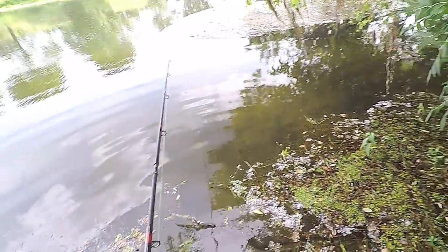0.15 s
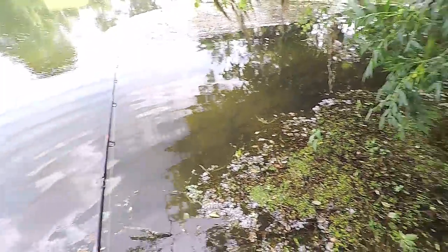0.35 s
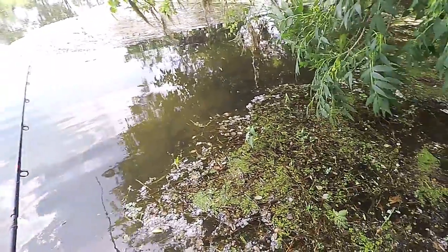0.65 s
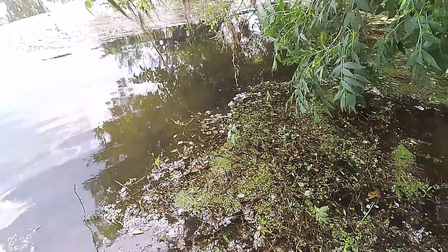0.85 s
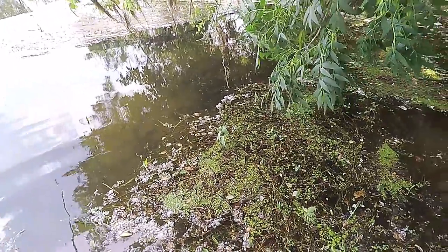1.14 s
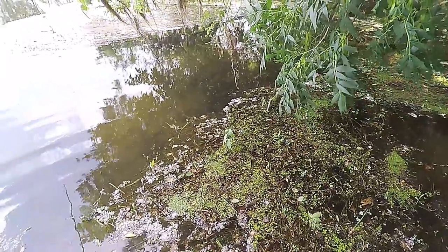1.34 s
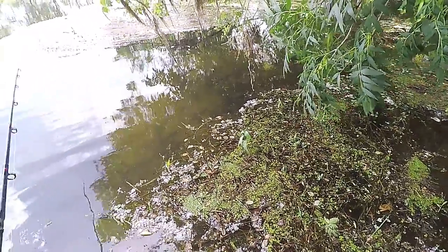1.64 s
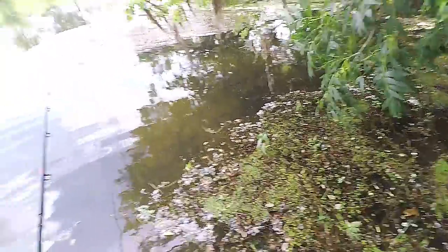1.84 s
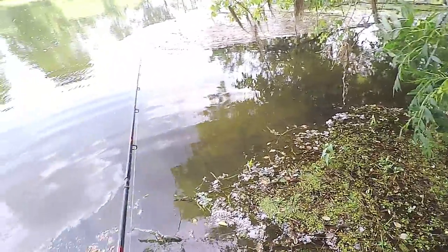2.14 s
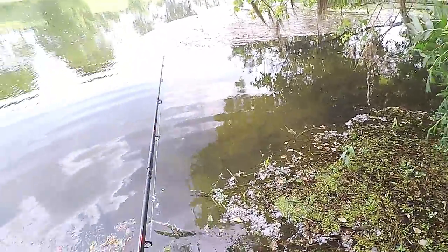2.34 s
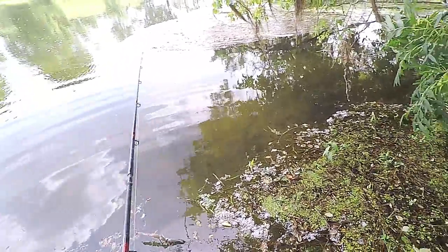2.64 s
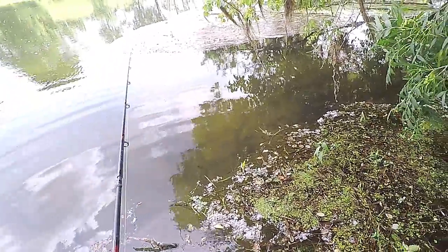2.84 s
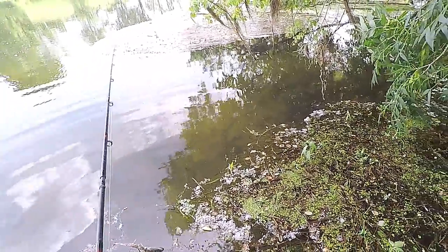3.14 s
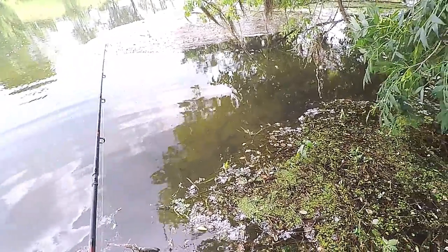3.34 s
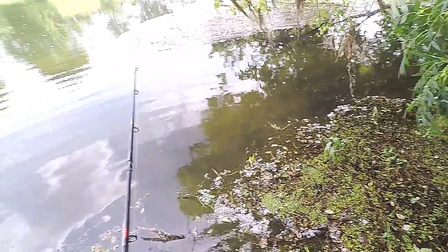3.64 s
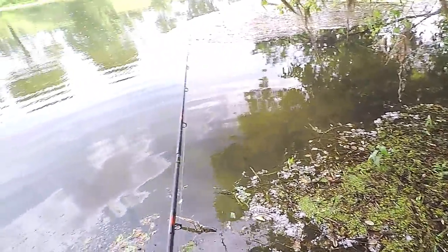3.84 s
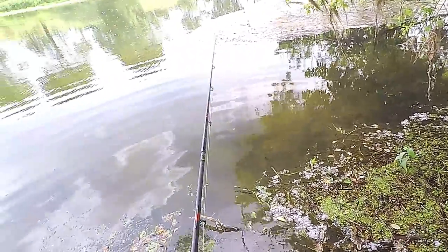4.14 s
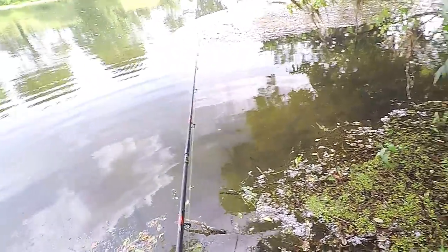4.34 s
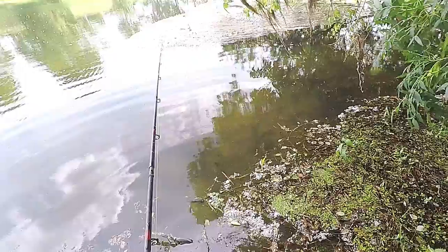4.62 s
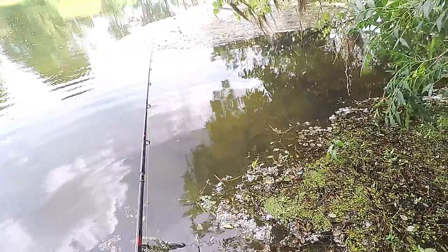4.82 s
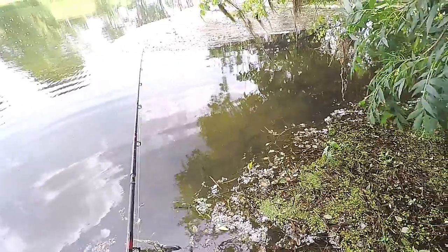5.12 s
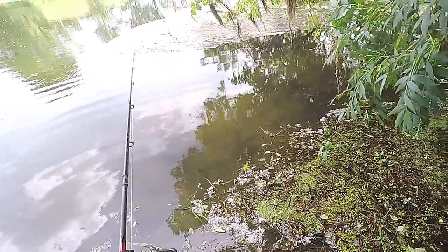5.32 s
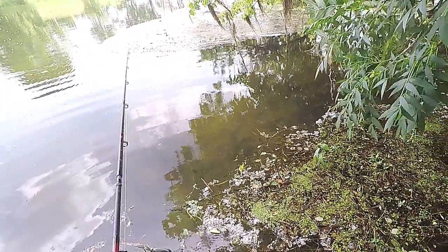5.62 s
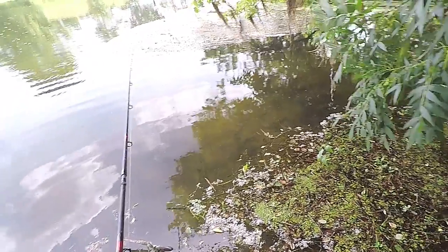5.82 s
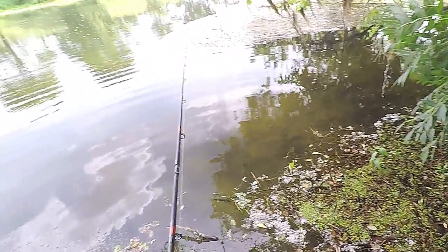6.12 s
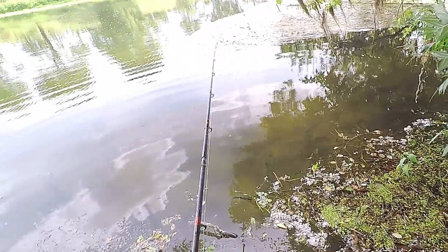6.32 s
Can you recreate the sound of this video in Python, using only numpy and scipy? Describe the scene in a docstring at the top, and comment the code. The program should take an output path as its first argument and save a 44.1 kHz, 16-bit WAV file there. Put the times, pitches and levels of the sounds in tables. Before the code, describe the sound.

Wood clonks the water three times in steady rhythm, each a slap and gulping bubble; drips settle, leaving birds and soft air.

```python
"""A still pond under trees full of birds: wood is driven three times into the water close to one microphone.
Each stroke slaps (filtered noise and a ringing blade), pulls open an air pocket and pinches it off into a
bubble whose gliding tone sings upward. Water sprays, trickles and drips after it as clicks and dying rings.
Birds are bending tones and blurred bands of noise, echoed by the trees. Low noise rumbles at the microphone
with the push of the first stroke, then in gusts of a dying breeze; the plops overload it. Beneath lies a
quiet bed of hum, leaves and hiss."""
import sys
import numpy as np
from scipy import signal
from scipy.fft import rfft, irfft
from scipy.io import wavfile
from scipy.ndimage import uniform_filter1d

SR = 44100
rng = np.random.default_rng(int(sys.argv[2]) if len(sys.argv) > 2 else 0)


def to_linear_factor(level_db):
    """Convert decibel levels (scalar or array-like) to linear amplitude factors."""
    exponent = np.asarray(level_db, float) / 20
    return 10 ** exponent


def transcribe(u):
    """Save the signal u as a 16-bit wav file named by the first command-line argument.

    u: samples, shape (n,) or (channels, n), limited to [-1, 1]; the rate is SR.
    q: integer samples, one column per channel.
    """
    v = np.clip(np.atleast_2d(u).T, -1, 1)
    q = np.round(v * 32767).astype(np.int16)
    wavfile.write(sys.argv[1], SR, q)


N = 285318


def rms_one(x):
    """Scale a sound to unit rms."""
    return x / np.sqrt(np.mean(x ** 2))


def coloured(x, points):
    """Shape a spectrum by (Hz, dB) points joined over log frequency; unit rms."""
    hz, db = np.transpose(points)
    f = np.maximum(np.arange(len(x) // 2 + 1) * SR / len(x), 1)
    gain = to_linear_factor(np.interp(np.log(f), np.log(hz), db))
    return rms_one(irfft(rfft(x) * gain, len(x)))


def band(x, hz, width_hz):
    """Keep a bell-shaped band of the spectrum; unit rms."""
    f = np.arange(len(x) // 2 + 1) * SR / len(x)
    bell = np.exp(-((f - hz) / width_hz) ** 2 * 2)
    return rms_one(irfft(rfft(x) * bell, len(x)))


def walk(rate_hz):
    """Random levels, held one period each and slewed twice into a smooth wander."""
    hold = int(SR / rate_hz)
    steps = np.repeat(rng.standard_normal(N // hold + 1), hold)
    return uniform_filter1d(uniform_filter1d(steps, hold), hold)[:N]


def add(out, s, x):
    """Mix x into out from time s."""
    i = max(int(s * SR), 0)
    out[i:i + len(x)] += x[:N - i]


def curve(rows):
    """Start time, sample times from there, and each column of a table at every sample."""
    s, *columns = np.transpose(rows)
    t = np.arange(s[0], min(s[-1], (N - 1) / SR), 1 / SR)
    return s[0], t, *(np.interp(t, s, c) for c in columns)


def fade(count, seconds):
    """Soft ends."""
    i = np.arange(count)
    to_end = np.minimum(i, count - i) / (seconds * SR)
    return np.sin(np.pi / 2 * np.clip(to_end, 0, 1)) ** 2


def decay(t, t60_s):
    """Die away by 60 dB in t60_s."""
    return np.exp(-np.log(1000) * t / t60_s)


def swell(s, rise_s, t60_s):
    """An envelope over the whole scene that climbs exponentially to 1 at time s and dies away."""
    t = np.arange(N) / SR - s
    return np.exp(np.where(t < 0, t / rise_s, -np.log(1000) * t / t60_s))


# level of the open pocket's swell: share_of_open_time, peak_db
OPEN_SWELL = [(0, -20), (.2, -5.5), (.36, 0)]
TROUGH_AT = .6  # share of the open time
# level as the pocket closes: share_of_open_time, peak_db
CLOSING = [(.8, -4), (1, .5)]
# first swings of the shut bubble: after_shutting_s, peak_db
FIRST_SWINGS = [(.002, 3.5), (.006, 2.5), (.0095, -3.5)]
# the shut bubble fading: share_of_life, peak_db
FADING = [(.88, -19.5), (1, -27)]


def pocket(shut_s, opening, pinched):
    """An air pocket deepens and drops in pitch, shuts at a crest of pressure, then sings upward."""
    open_s, first_hz, last_hz, trough_db = opening
    life_s, low_hz, top_hz, climb_s, later_db = pinched
    t = np.arange(-int(open_s * SR), int(life_s * SR)) / SR  # 0 where it shuts
    opened = np.clip(1 + t / open_s, 0, 1)
    deepening_hz = first_hz + (last_hz - first_hz) * (1 - np.cos(np.pi * opened)) / 2
    rising_hz = top_hz - (top_hz - low_hz) * np.exp(-t / climb_s)
    hz = np.where(t < 0, deepening_hz, rising_hz)
    open_shares = OPEN_SWELL + [(TROUGH_AT, trough_db)] + CLOSING
    while_open = [((share - 1) * open_s, db) for share, db in open_shares]
    life_shares = [(0.46, later_db)] + FADING
    once_shut = FIRST_SWINGS + [(share * life_s, db) for share, db in life_shares]
    db = np.interp(t, *np.transpose(while_open + once_shut))
    turns = np.cumsum(hz) / SR
    turns -= np.interp(0, t, turns)  # puts a crest at the moment of shutting
    return shut_s - open_s, to_linear_factor(db) * np.cos(2 * np.pi * turns) * fade(len(t), 0.0015)


# moments when the mouth of each pocket closes: shut_s
SHUT_S = [.1915, .8968, 1.6176]
# open pocket of each stroke: open_s, first_pitch_hz, last_pitch_hz, last_trough_peak_db
OPENING = [(.021, 118, 68, -2), (.020, 104, 42, 2), (.0256, 96, 45, -5.5)]
# shut bubble of each stroke: life_s, first_pitch_hz, final_pitch_hz, climb_time_constant_s,
# peak_db at 0.46 of its life
PINCHED = [(.035, 90, 400, .0095, -10), (.050, 170, 455, .033, -4), (.042, 180, 380, .0135, -10.5)]


def pockets():
    """The three breathing air pockets, one to a stroke."""
    out = np.zeros(N)
    for stroke in zip(SHUT_S, OPENING, PINCHED):
        add(out, *pocket(*stroke))
    return out


# slaps of wood on water: peak_s, hiss_level_db, t60_s, blade_ring_gain_db
SLAPS = [(0.1705, -23, 0.02, -11.5), (0.173, -13.5, 0.022, -18), (0.182, -27, 0.026, -37),
         (.187, -19.5, 0.041, -38), (0.195, -38, 0.072, -31), (0.886, -13.5, 0.025, -13.5),
         (.897, -19.5, 0.022, -26), (1.577, -47, 0.03, -37), (1.586, -28, 0.033, -24),
         (1.595, -14, 0.027, -8), (1.605, -27.5, 0.064, -31), (1.621, -26.5, 0.049, -34)]
SLAP_RISE_S = 0.0027  # e-fold time
# relative spectrum of the slap hiss: frequency_hz, density_db
SLAP_COLOUR = [(350, -14), (600, 8.5), (915, -7.5), (1320, -2.5), (1600, -8), (1830, -6.5), (2540, -7),
               (3710, -11), (4490, -6.5), (5580, -12), (7130, -11), (8630, -16), (10000, -40), (13300, -31),
               (15500, -42)]
# modes of the wooden blade: pitch_hz, relative_level_db, t60_s
BLADE = [(520, 1, 0.03), (1303, -1.5, 0.031), (2600, 1.5, 0.0062), (4600, -21, 0.037), (6760, -31, .013)]


def slaps():
    """Wood meets water: short swells of hiss, each with a dying ring of the blade's modes."""
    out = np.zeros(N)
    hiss = coloured(rng.standard_normal(N), SLAP_COLOUR)
    after = np.arange(SR // 8) / SR
    blade = sum(to_linear_factor(db) * np.sin(2 * np.pi * hz * after) * decay(after, t60) for hz, db, t60 in BLADE)
    for s, hiss_db, t60, ring_db in SLAPS:
        out += to_linear_factor(hiss_db) * swell(s, SLAP_RISE_S, t60) * hiss
        add(out, s, to_linear_factor(ring_db) * blade)
    return out


def grains(rate_hz, spread_db):
    """Scattered clicks, a few large among many small."""
    hits = rng.random(N) < rate_hz / SR
    return hits * rng.standard_normal(N) * to_linear_factor(spread_db * rng.exponential(size=N))


def bubble(hz, cycles, glide):
    """A ring that starts at hz, loses two e-folds in its cycles and climbs as it nears the surface."""
    turns = np.arange(int(3 * cycles / hz * SR)) * hz / SR
    ring = np.sin(2 * np.pi * turns * (1 + glide * turns / cycles / 2))
    return ring * np.exp(-2 * turns / cycles) * (1 - np.exp(-2 * turns))


def trickle_bubbles():
    """Thousands of tiny rising rings, random in time, pitch and loudness; unit rms while wet."""
    wet_s = 2.5
    out = np.zeros(N)
    for when, size, loud in rng.random((2500, 3)):
        ring = bubble(650 * 3.02 ** size, 7.7, 0.266)
        add(out, when * wet_s, to_linear_factor(14 * loud ** 4) * ring)
    return out / np.sqrt(np.mean(out[:int(wet_s * SR)] ** 2))


# relative spectrum of the spray: frequency_hz, density_db
SPRAY_COLOUR = [(1180, -34), (2000, -18), (2120, 4.5), (3100, 6), (3460, 0), (4590, 11), (6870, 10.5),
                (7610, 2.5), (8880, -62), (10200, -48), (12300, -26), (14700, -28), (15500, -33)]
# water thrown up or shaken off: peak_s, spray_level_db, trickle_level_db, rise_e_fold_s, t60_s
SHOWERS = [(0.0, -46.5, -60, .01, .25), (.15, -40, -64, 0.018, .3), (.205, -40, -36, .01, 0.58),
           (.39, -55, -46, .05, 0.34), (.48, -44, -43.5, 0.07, 0.74), (.748, -47, -66, .02, 0.41),
           (.872, -40.5, -50, 0.019, .2), (.915, -42.5, -40.5, .01, 1.7), (1.15, -50, -46, .05, 0.35),
           (1.307, -49.5, -71, 0.14, .5), (1.477, -38, -54, 0.0055, .15), (1.575, -43.5, -53, .02, 0.17),
           (1.662, -40, -36, 0.025, 0.14), (1.72, -49, -60, .03, 1.6), (1.845, -49, -43.5, 0.069, 1.1),
           (1.99, -54, -57, .03, 0.31), (2.197, -44.5, -66, 0.0064, 0.72)]
# tiny bubbles rush into the hole as each pocket shuts
GURGLE_DB, GURGLE_AFTER_S, GURGLE_RISE_S, GURGLE_T60_S = -31.5, 0.011, 0.0029, 0.1


def showers():
    """Fine spray of filtered clicks and a trickle of bubbles, each under swells whose powers add."""
    spray = coloured(grains(6000, 1.3), SPRAY_COLOUR) * to_linear_factor(3.2 * walk(59.57))
    trickle = trickle_bubbles()
    spray_power, trickle_power = np.zeros(N), np.zeros(N)
    for s in SHUT_S:
        gurgle = to_linear_factor(GURGLE_DB) * swell(s + GURGLE_AFTER_S, GURGLE_RISE_S, GURGLE_T60_S)
        trickle_power += gurgle ** 2
    for s, spray_db, trickle_db, rise, t60 in SHOWERS:
        power = swell(s, rise, t60) ** 2
        spray_power += to_linear_factor(2 * spray_db) * power
        trickle_power += to_linear_factor(2 * trickle_db) * power
    return np.sqrt(spray_power) * spray + np.sqrt(trickle_power) * trickle


# droplets that tick on the surface: start_s, onset_level_db, centre_hz
TICKS = [(0.1256, -40, 6670), (0.284, -40, 5740), (0.414, -39, 4370), (0.461, -36, 5570),
         (0.4836, -31.5, 5300), (0.5474, -45, 4870), (0.6085, -35, 6400), (0.7506, -29.5, 6560),
         (0.848, -31, 5500), (1.036, -41, 6850), (1.313, -33, 5900), (1.475, -32, 5500),
         (1.5633, -45, 4150), (1.8214, -50, 5860), (2.1944, -42, 6540)]
TICK_WIDTH_HZ, TICK_DECAY_S = 2900, 0.0047


def ticks():
    """Droplets hit the surface: bursts of banded noise that die in milliseconds."""
    out = np.zeros(N)
    after = np.arange(SR // 20) / SR
    for s, db, hz in TICKS:
        noise = rng.standard_normal(len(after))
        body = band(noise, hz, TICK_WIDTH_HZ)
        sheen = to_linear_factor(-24) * band(noise, 15800, 1700)  # faint, above the body
        add(out, s, to_linear_factor(db) * (body + sheen) * np.exp(-after / TICK_DECAY_S))
    return out


# droplets that trap a small bubble: start_s, gain_db, starting_pitch_hz, decay_cycles (two e-folds)
BUBBLES = [(.140, -29, 2500, 6), (.353, -31, 1080, 8.8), (.396, -31, 2680, 6), (.440, -29.5, 1880, 17),
           (1.025, -31, 1000, 6), (1.044, -30, 860, 8), (1.092, -26, 1410, 9.4), (1.093, -26, 706, 5),
           (1.14, -33, 1075, 12), (1.112, -37, 4000, 9), (1.121, -29.5, 3500, 6.5), (1.163, -31, 1780, 14),
           (1.172, -32, 3970, 10), (1.226, -29, 4100, 8.4), (1.475, -23.5, 2140, 9.1),
           (1.564, -30, 3600, 8), (1.782, -30, 4300, 12), (1.786, -28.5, 466, 8.7), (1.826, -36, 2600, 8),
           (1.848, -25, 1400, 8.4), (1.852, -35, 750, 10), (1.905, -25, 2360, 4.5), (1.980, -30, 1620, 4),
           (2.038, -31, 2600, 6.7)]


def drops():
    """Single droplets trap air that rings and climbs in pitch."""
    out = np.zeros(N)
    for s, db, hz, cycles in BUBBLES:
        add(out, s, to_linear_factor(db) * bubble(hz, cycles, 0.19))
    return out


# clear notes of nearer birds: start_s, length_s, start_pitch_hz, middle_pitch_hz, end_pitch_hz,
# start_level_db, end_level_db
WHISTLES = [ (0, .1, 2125, 2015, 1970, -44.5, -53), (.365, .072, 1800, 1720, 1694, -48, -54),
            (.43, .027, 1700, 1870, 2500, -48, -46), (.525, .098, 2080, 2195, 2270, -45, -50),
            (.613, .033, 2250, 2440, 2594, -50, -45), (.636, .14, 2594, 2588, 2580, -44.5, -56),
            (1.04, .092, 1835, 1840, 1870, -57, -47), (1.122, .044, 1860, 2230, 2545, -46, -49),
            (1.156, .16, 2540, 2595, 2540, -47, -66), (1.505, .065, 3680, 3610, 3540, -60, -55),
            (2.015, .06, 3470, 3170, 3080, -51, -48), (2.15, .075, 1250, 1500, 1780, -62, -50),
            (2.215, .068, 1740, 1840, 1860, -50, -42), (2.292, .042, 1750, 2000, 1600, -45, -46),
            (2.341, .047, 1800, 1930, 1740, -46, -51), (2.182, .085, 3640, 3300, 3370, -50, -52),
            (2.255, .14, 3340, 3620, 3600, -49, -58), (2.4, .06, 2870, 2740, 2665, -48, -50),
            (2.45, .1, 2675, 2650, 2650, -50, -53), (2.545, .115, 1660, 1710, 1610, -47, -54),
            (2.721, .018, 2130, 2410, 2520, -50, -44), (2.732, .054, 2520, 2500, 2460, -44, -42),
            (2.779, .017, 2480, 2370, 1950, -41, -43), (2.96, .08, 3450, 3220, 3310, -47, -60),
            (3.078, .042, 3560, 3470, 3420, -53, -53), (3.115, .085, 3560, 2670, 2300, -44, -55),
            (3.757, .03, 2325, 2080, 1960, -54, -50), (3.779, .078, 1970, 1960, 2030, -51, -48),
            (3.848, .044, 2030, 1800, 1620, -48, -55), (3.885, .105, 1610, 1770, 1850, -52, -55),
            (4.76, .09, 2150, 2200, 2240, -55, -49), (4.84, .15, 2237, 2265, 2270, -49, -57),
            (4.88, .3, 2825, 2870, 2795, -52.5, -51.5), (6.12, .15, 1615, 1720, 1715, -52, -57)]
# hoarse notes, whose pitch wavers widely: the same columns
HOARSE_NOTES = [ (2.6, .062, 4050, 3740, 3320, -55, -52), (2.735, .043, 5250, 4900, 4350, -52, -38),
                (2.85, .12, 3740, 3890, 3980, -50, -56), (2.94, .16, 5520, 5740, 5700, -59, -60),
                (3.478, .1, 1705, 1950, 2095, -52, -52), (3.57, .18, 2080, 2170, 2200, -51, -58),
                (3.65, .18, 6100, 6300, 6400, -59, -61), (4.09, .15, 2520, 2300, 2200, -52, -49),
                (4.23, .14, 2215, 2120, 2045, -49, -46.5), (4.36, .09, 2050, 2030, 2016, -47, -59),
                (4.14, .27, 4830, 4700, 4750, -51, -63), (5.98, .045, 5150, 4990, 4890, -60, -48),
                (6.017, .18, 4890, 4885, 4890, -47.5, -61)]
CLEAR_WAVER_HZ, HOARSE_WAVER_HZ, NOTE_EDGE_S = 12, 90, .008  # scale of the pitch wander; soft ends


def whistles():
    """Each note bends smoothly through three pitches as its level slides and flutters."""
    out, waver, flutter = np.zeros(N), walk(250), walk(70)
    for rows, waver_hz in ((WHISTLES, CLEAR_WAVER_HZ), (HOARSE_NOTES, HOARSE_WAVER_HZ)):
        for s, length, start_hz, middle_hz, end_hz, start_db, end_db in rows:
            u = np.linspace(0, 1, int(length * SR))
            i = np.arange(len(u)) + int(s * SR)
            bend = np.polyfit([0, .5, 1], [start_hz, middle_hz, end_hz], deg=2)
            hz = np.polyval(bend, u) + waver_hz * waver[i]
            tone = np.sin(2 * np.pi * np.cumsum(hz) / SR)
            db = start_db + (end_db - start_db) * u + 1.5 * flutter[i]
            add(out, s, np.sqrt(2) * to_linear_factor(db) * tone * fade(len(u), NOTE_EDGE_S))
    return out


# trill of a nearer bird: time_s, pitch_hz, level_db, pitch_swing_hz
TRILL = [(6.295, 2040, -52, 5), (6.315, 1980, -43, 10), (6.33, 1930, -43, 100), (6.35, 1926, -46, 210),
         (6.39, 2080, -41.5, 280), (6.435, 2116, -42.5, 290), (6.465, 2060, -56, 270)]
TRILL_RATE_HZ, TRILL_TOP_S = 51.7, 4.6  # rate of the swings; a moment that sets their phase
TRILL_LEAD, TRILL_THROB_DB = 0.11, 7  # share of a swing; throb at the widest swing


def trill():
    """A tone swings fast in pitch and throbs loudest just before each top."""
    out = np.zeros(N)
    s, t, hz, db, swing_hz = curve(TRILL)
    beat = 2 * np.pi * (t - TRILL_TOP_S) * TRILL_RATE_HZ
    chirp = np.sin(2 * np.pi * np.cumsum(hz + swing_hz * np.cos(beat)) / SR)
    throb_db = TRILL_THROB_DB * swing_hz / swing_hz.max() * np.cos(beat + 2 * np.pi * TRILL_LEAD)
    add(out, s, np.sqrt(2) * to_linear_factor(db + throb_db) * chirp * fade(len(t), .004))
    return out


# far birds blurred by the trees: start_s, end_s, centre_hz, width_hz, starting_level_db
FAR_BIRDS = [(2.049, 2.116, 5030, 900, -50), (2.282, 2.374, 4430, 600, -51.5),
             (2.622, 2.703, 3700, 700, -49), (2.735, 2.92, 4670, 1100, -53), (4.49, 4.7, 5140, 1400, -51.5),
             (5.098, 5.323, 7200, 1200, -55), (5.23, 5.3, 4430, 500, -51), (5.27, 5.416, 4180, 450, -50),
             (5.36, 5.875, 4280, 600, -55), (5.368, 5.44, 6460, 500, -54), (5.768, 5.86, 6630, 600, -54),
             (5.83, 5.98, 6940, 500, -56), (6.117, 6.247, 6450, 600, -57), (6.2, 6.473, 5640, 2200, -52.5)]
# far rattling calls: the same columns, the level that of noise before its throb
FAR_RATTLES = [(3.817, 3.903, 4440, 500, -46), (3.92, 4.01, 4450, 600, -46)]
RATTLE_RATE_HZ = 46


def far_birds():
    """Distant song arrives as bands of noise that sink by 4 dB; rattles also throb."""
    out = np.zeros(N)
    for rows, throb_hz in ((FAR_BIRDS, 0), (FAR_RATTLES, RATTLE_RATE_HZ)):
        for s, end, hz, width_hz, db in rows:
            t = np.arange(int((end - s) * SR)) / SR
            throb = (1 + np.cos(2 * np.pi * throb_hz * t)) / 2  # steady 1 at a rate of 0
            blur = band(rng.standard_normal(len(t)), hz, width_hz)
            add(out, s, to_linear_factor(db - 4 * t / t[-1]) * blur * throb * fade(len(t), 0.018))
    return out


TREES_T60_S, TREES_DB, TREES_DELAY_S = 0.4, -8.5, .025


def birds():
    """Near and far song, scattered back by the trees as a dying noise-like echo."""
    song = whistles() + trill() + far_birds()
    t = np.arange(SR // 2) / SR
    echoes = rng.standard_normal(len(t)) * decay(t, TREES_T60_S) * (t > TREES_DELAY_S)
    echoes *= to_linear_factor(TREES_DB) / np.sqrt(np.sum(echoes ** 2))
    return song + signal.fftconvolve(song, echoes)[:N]


# low rumble at the microphone, the push of the first stroke and then gusts of breeze, before its
# random wander: time_s, rumble_level_db, hollow_note_level_db
LOW_RUMBLE = [(0.0, -28.5, -47), (0.18, -18, -33), (0.29, -30.5, -48), (0.45, -21, -39.5), (0.7, -29, -58),
              (0.83, -23, -39), (0.95, -36, -58), (1.19, -27.5, -56), (1.75, -32.5, -56), (2.03, -24, -50),
              (2.41, -24, -37), (2.74, -25.5, -44), (3.06, -30, -40), (3.69, -35.5, -39.5),
              (4.43, -38.5, -41.5), (4.74, -46, -45), (5.6, -55, -54), (6.47, -64, -44.5)]
# relative spectrum of the rumble: frequency_hz, density_db
RUMBLE_COLOUR = [(8.8, -39), (15, 5.5), (43, 3.5), (68, 0.5), (150, -14), (327, -30.5), (378, -36),
                 (425, -52.5), (500, -28.5), (650, -43), (1100, -120)]


def low_rumble():
    """Low noise pushed by the first stroke, then by gusts, with a hollow band near the housing's resonance."""
    out = np.zeros(N)
    s, t, rumble_db, hollow_db = curve(LOW_RUMBLE)
    rumble = coloured(rng.standard_normal(N), RUMBLE_COLOUR) * to_linear_factor(1.7 * walk(21.88))
    hollow = band(rng.standard_normal(N), 166, 60) * to_linear_factor(1.4 * walk(20))
    add(out, s, to_linear_factor(rumble_db) * rumble[:len(t)] + to_linear_factor(hollow_db) * hollow[:len(t)])
    return out


# single puffs that ring the housing: time_s (a quarter of the length in), peak_db, pitch_hz, length_s
PUFFS = [(2.457, -11, 65, 0.018), (2.572, -15.5, 61.9, 0.032), (3.609, -27, 185, 0.036),
         (3.652, -24, 160, 0.034), (3.766, -21, 170, 0.042), (3.919, -29.5, 150, 0.036),
         (4.067, -20, 153, 0.032), (4.349, -26, 141, 0.043), (4.426, -18.5, 151, 0.047),
         (4.55, -31, 151, 0.04)]


def puffs():
    """A puff of air rings the housing: a low tone under one smooth hump."""
    out = np.zeros(N)
    for s, db, hz, length in PUFFS:
        t = np.arange(int(length * SR)) / SR
        hump = np.sin(np.pi * t / length) ** 2
        add(out, s - length / 4, to_linear_factor(db) * hump * np.cos(2 * np.pi * hz * (t - length / 2)))
    return out


# relative spectrum of the background: frequency_hz, density_db
AIR = [(50, -51), (85, -63), (143, -0.5), (194, -1.5), (334, -6.5), (483, -10.5), (539, -13.5),
       (1860, -22.5), (3420, -32), (4150, -28), (5050, -28), (7470, -33.5), (8890, -28), (14000, -43),
       (15300, -47)]
AIR_DB = -39  # level about which it wanders


def air():
    """Distant hum, leaves and microphone hiss: filtered noise whose level slowly wanders."""
    return to_linear_factor(AIR_DB + 0.81 * walk(3.63)) * coloured(rng.standard_normal(N), AIR)


def scene():
    """Everything at one microphone."""
    plops = pockets() + slaps()
    water = showers() + ticks() + drops()
    return (plops + water + birds() + low_rumble() + puffs() + air())[None]


def roll_off(x):
    """The treble ends steeply here."""
    return signal.sosfilt(signal.butter(12, 15640, fs=SR, output="sos"), x)


def record(dry):
    """The very top is filtered off, and whatever passes full scale is cut flat."""
    top_hz = 15100
    low_pass = signal.ellip(8, .2, 40, top_hz, fs=SR, output="sos")
    dull = signal.sosfilt(low_pass, dry)
    mix = np.clip(dull, -1, 1)
    return roll_off(mix)


dry = scene()
out = record(dry)
transcribe(out)
```